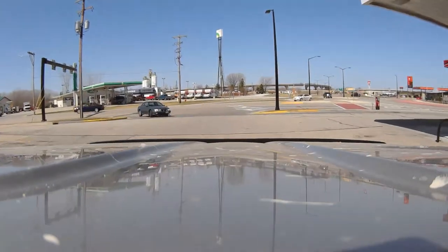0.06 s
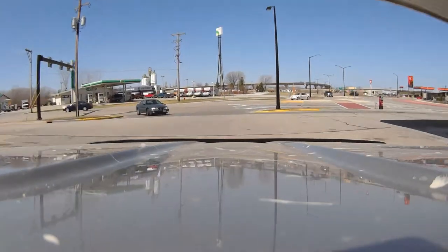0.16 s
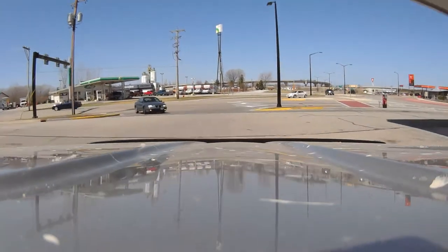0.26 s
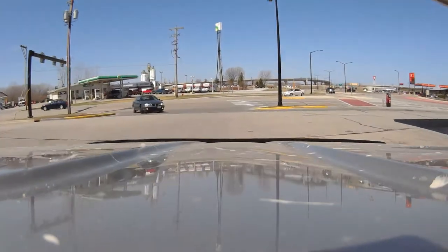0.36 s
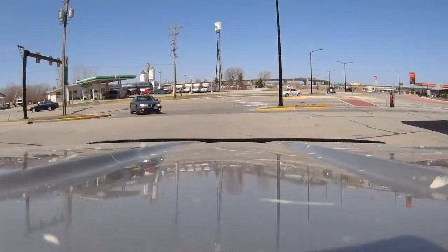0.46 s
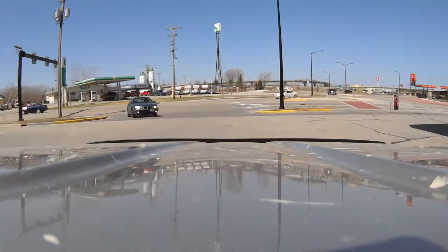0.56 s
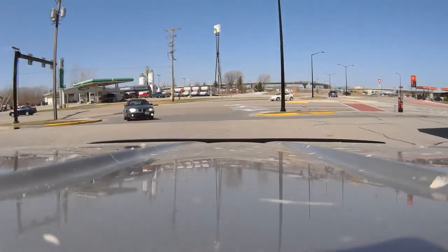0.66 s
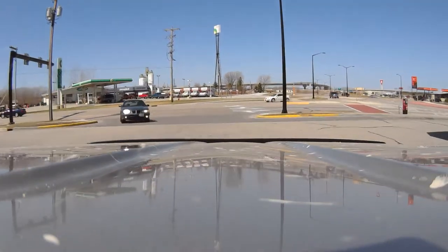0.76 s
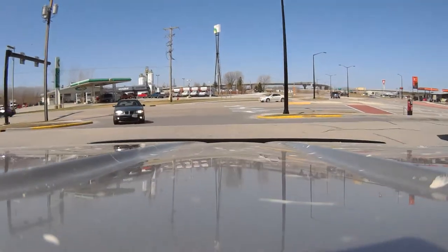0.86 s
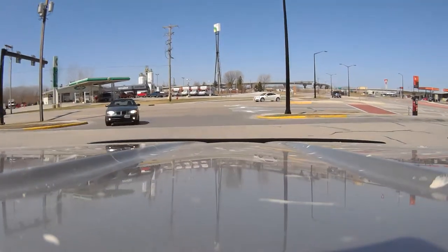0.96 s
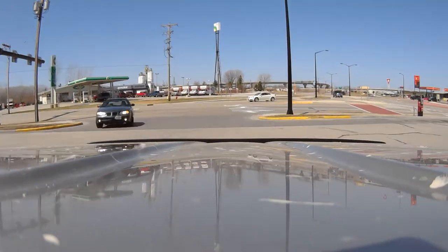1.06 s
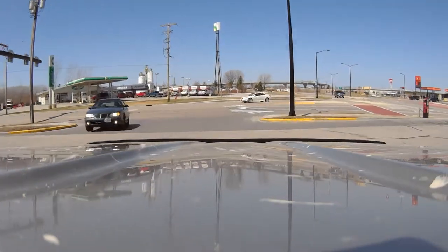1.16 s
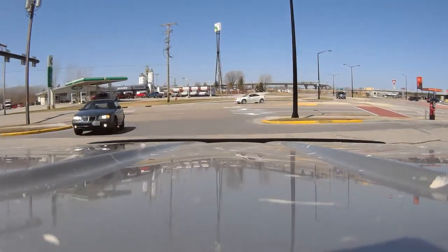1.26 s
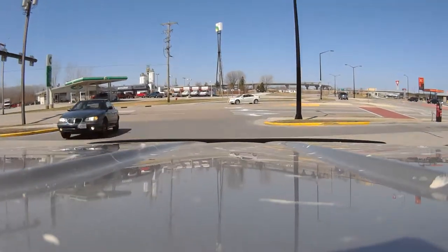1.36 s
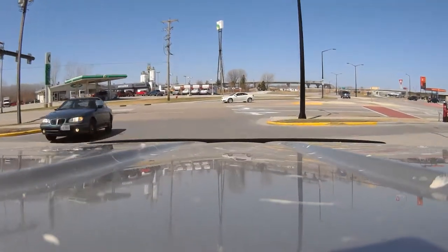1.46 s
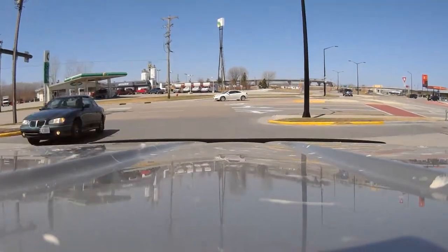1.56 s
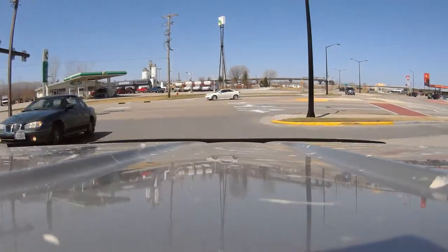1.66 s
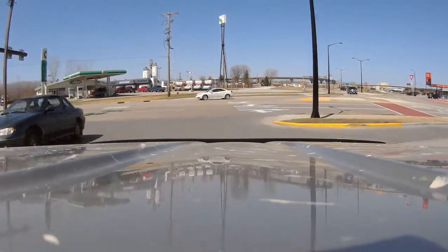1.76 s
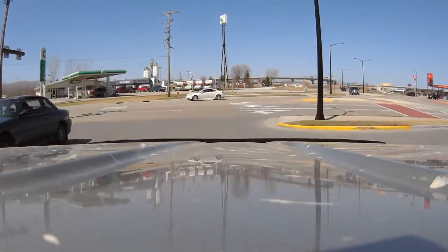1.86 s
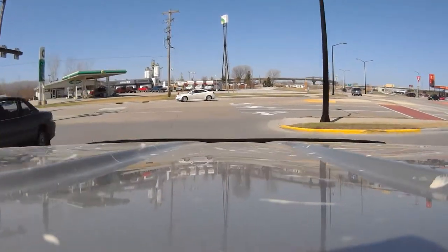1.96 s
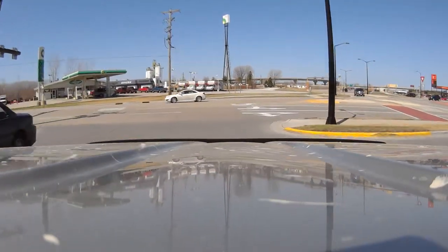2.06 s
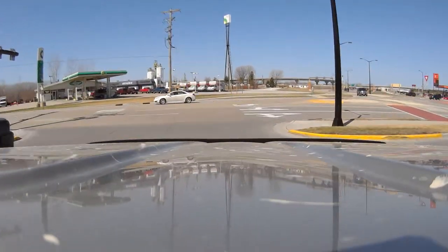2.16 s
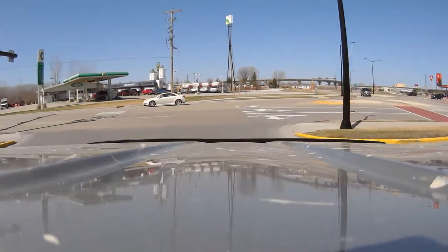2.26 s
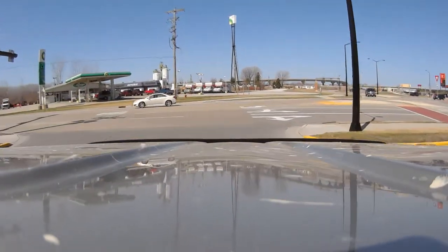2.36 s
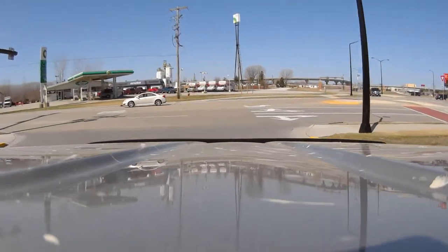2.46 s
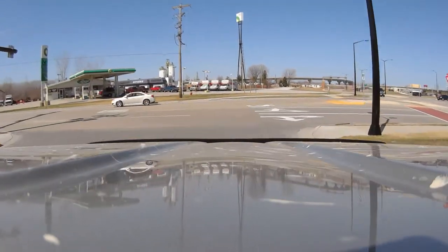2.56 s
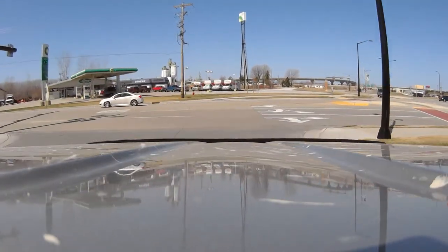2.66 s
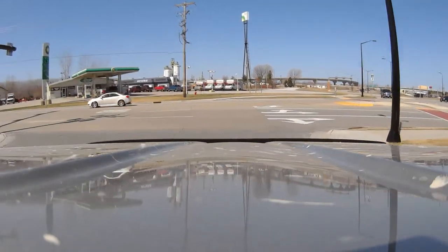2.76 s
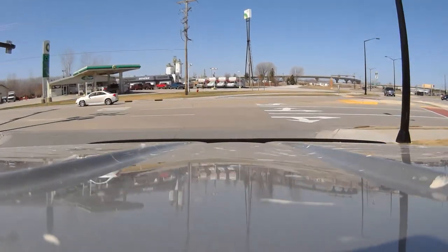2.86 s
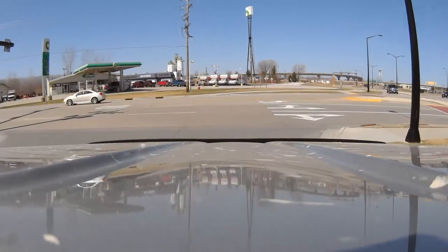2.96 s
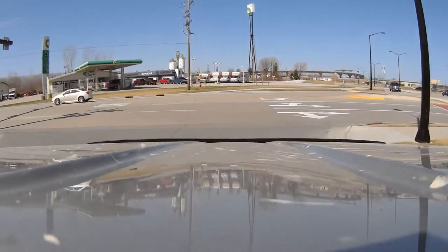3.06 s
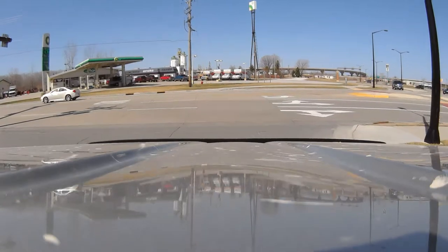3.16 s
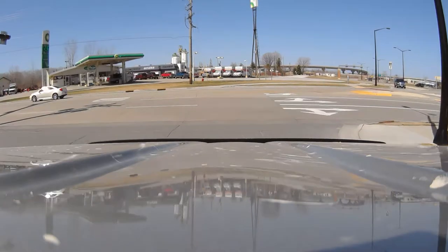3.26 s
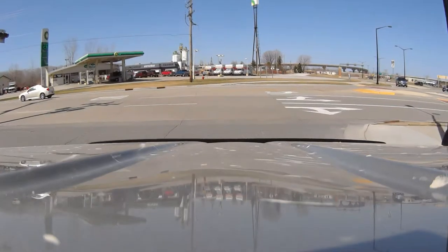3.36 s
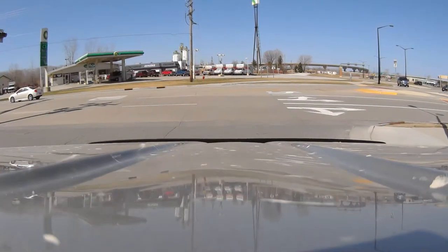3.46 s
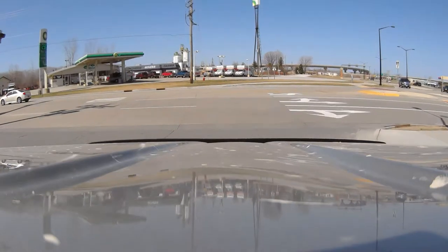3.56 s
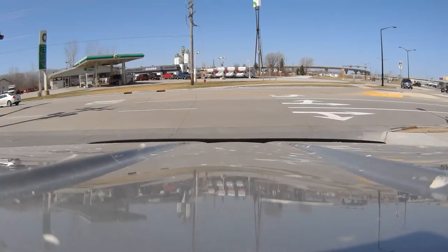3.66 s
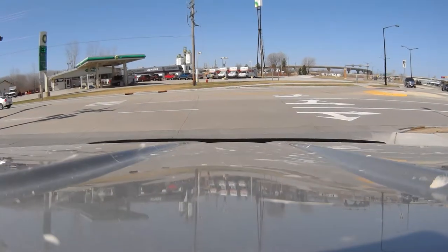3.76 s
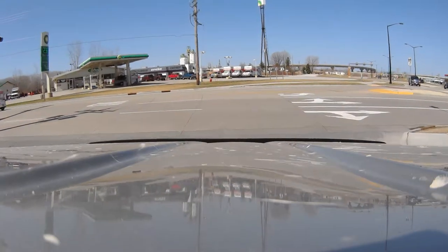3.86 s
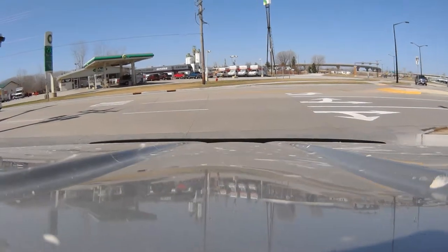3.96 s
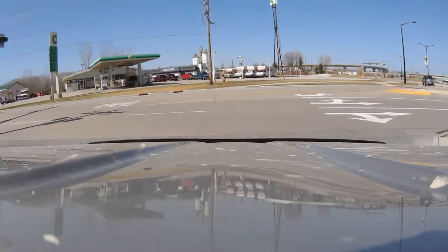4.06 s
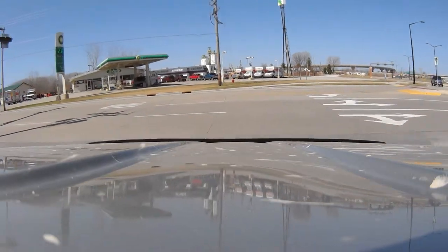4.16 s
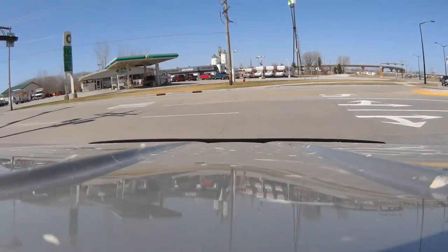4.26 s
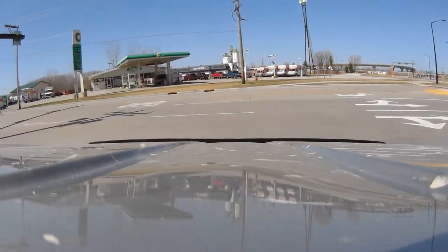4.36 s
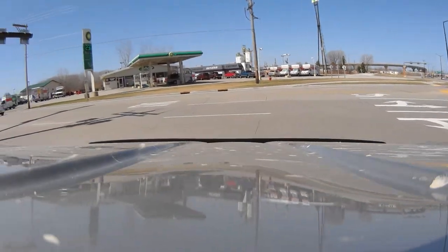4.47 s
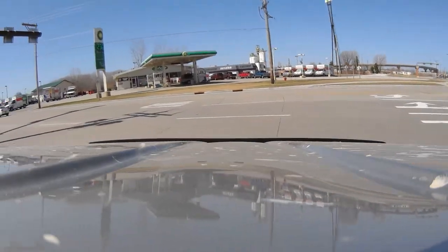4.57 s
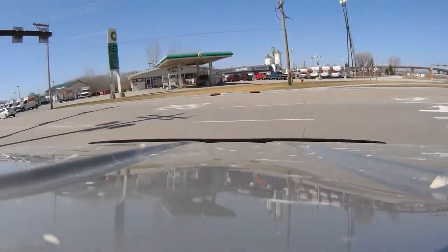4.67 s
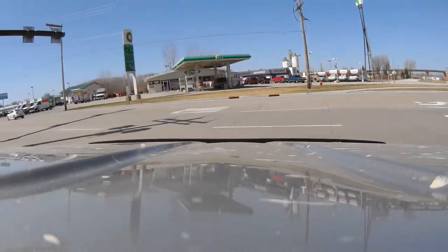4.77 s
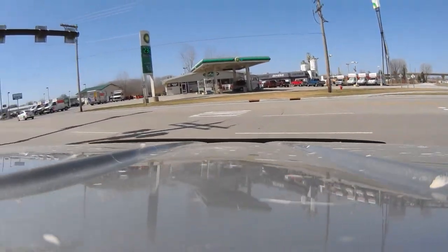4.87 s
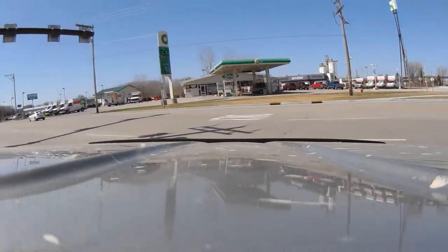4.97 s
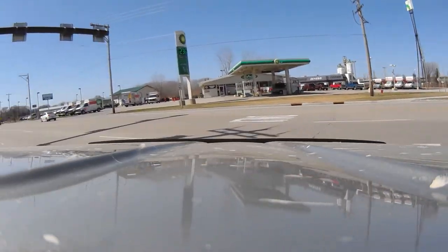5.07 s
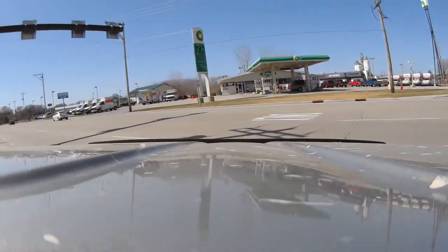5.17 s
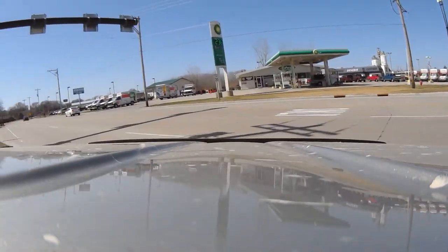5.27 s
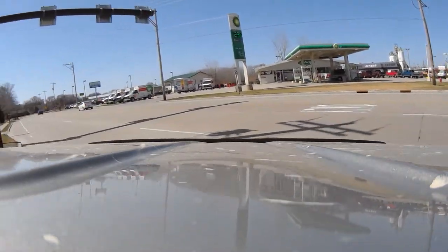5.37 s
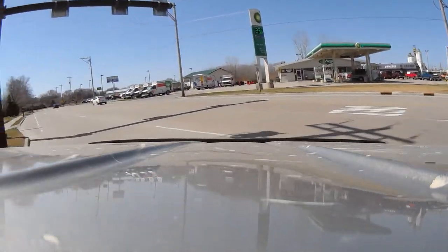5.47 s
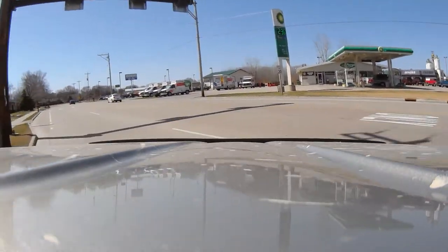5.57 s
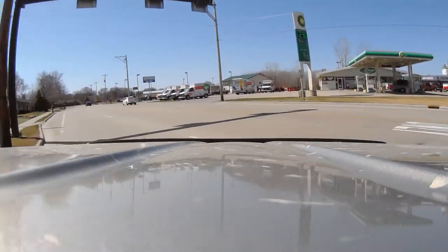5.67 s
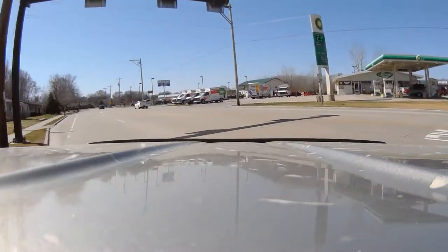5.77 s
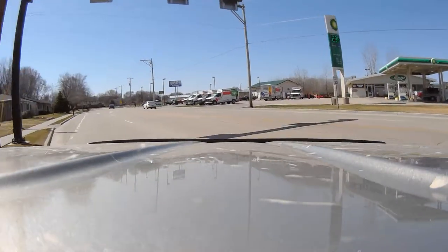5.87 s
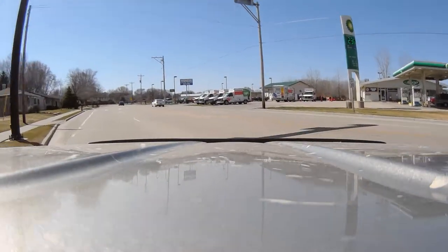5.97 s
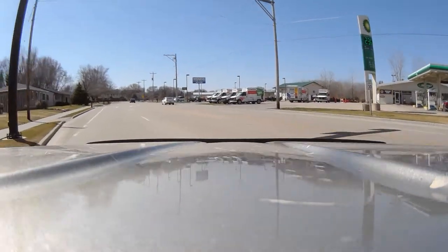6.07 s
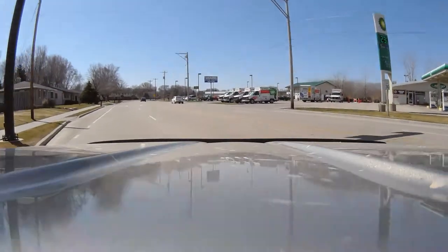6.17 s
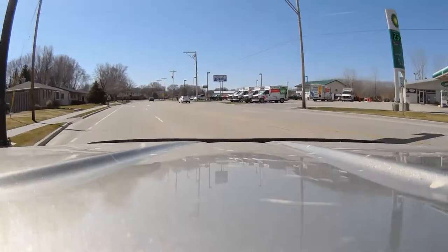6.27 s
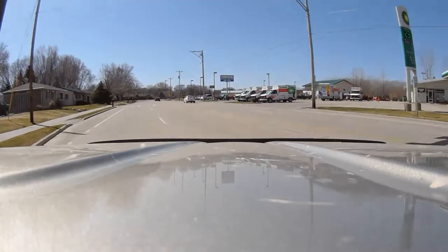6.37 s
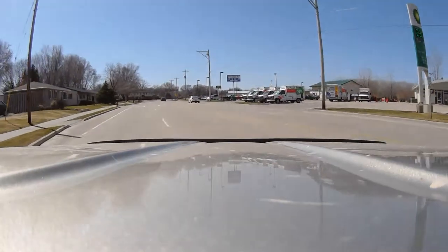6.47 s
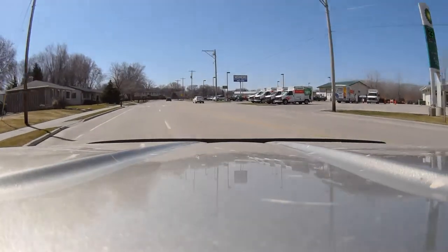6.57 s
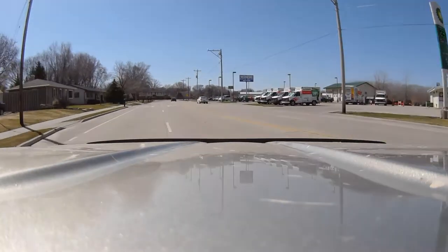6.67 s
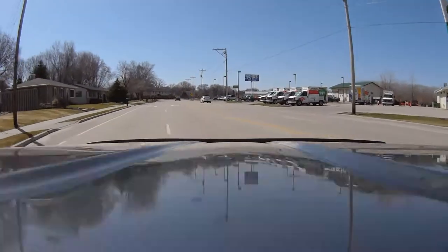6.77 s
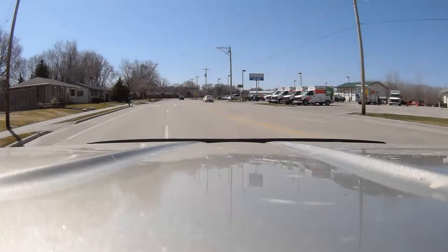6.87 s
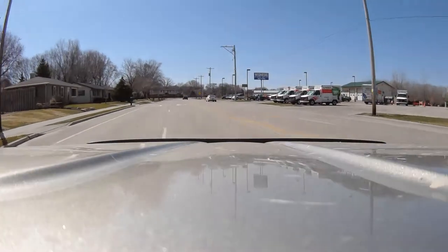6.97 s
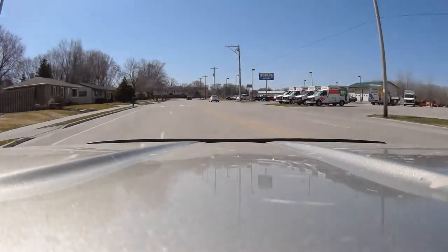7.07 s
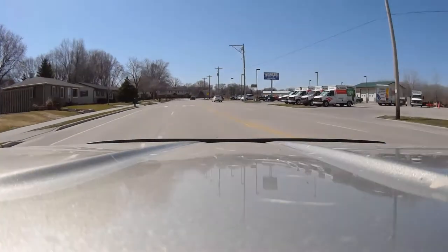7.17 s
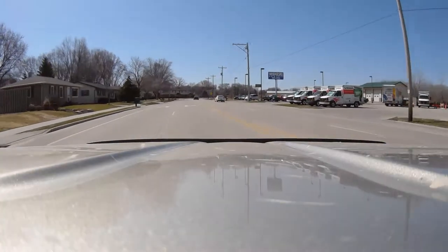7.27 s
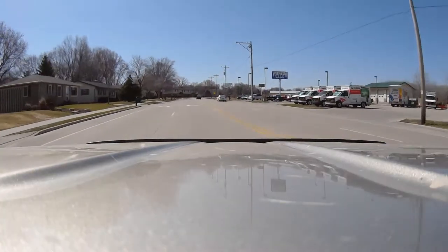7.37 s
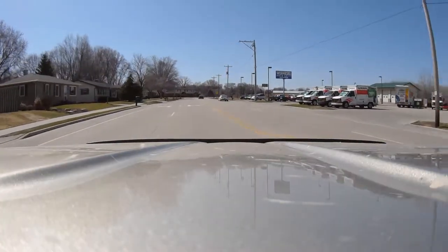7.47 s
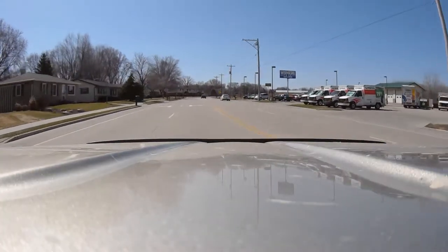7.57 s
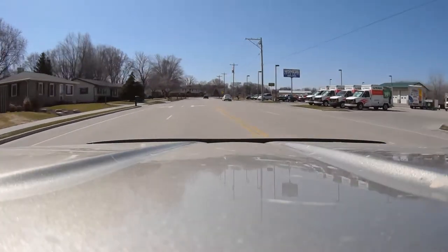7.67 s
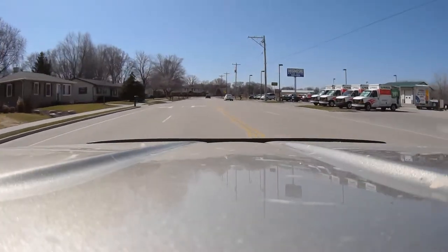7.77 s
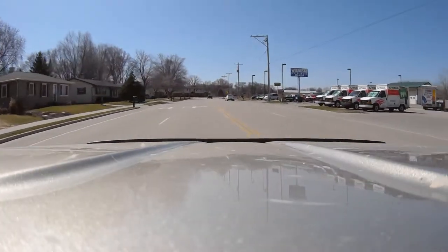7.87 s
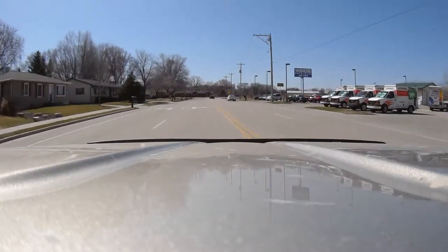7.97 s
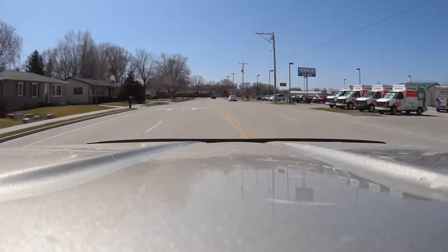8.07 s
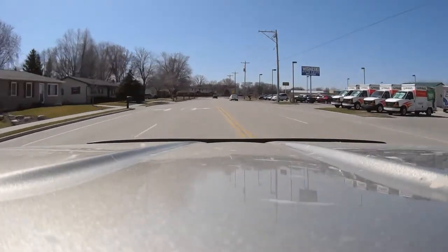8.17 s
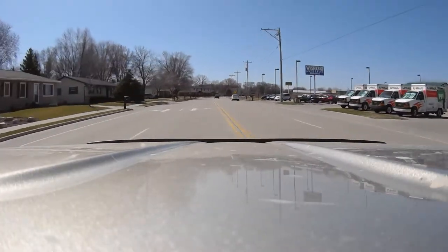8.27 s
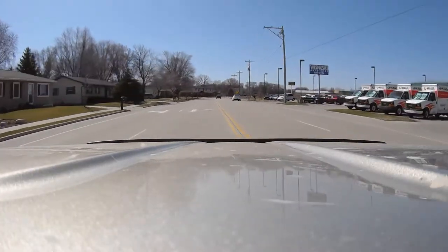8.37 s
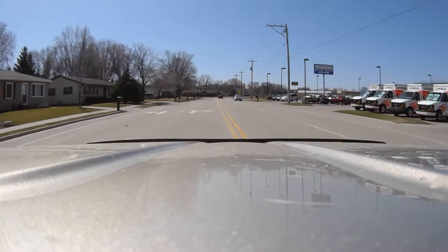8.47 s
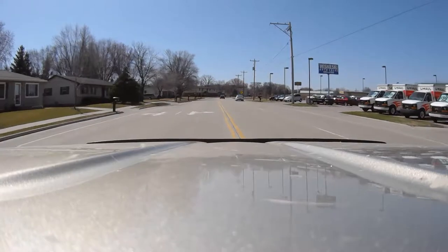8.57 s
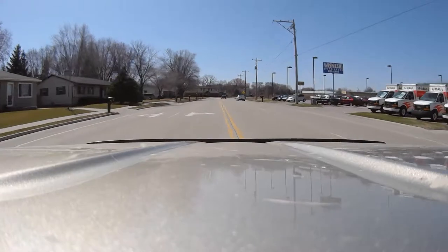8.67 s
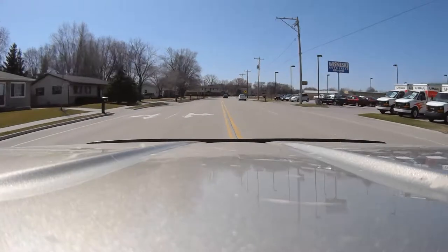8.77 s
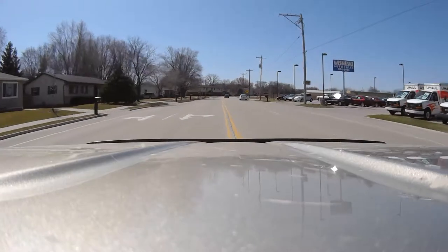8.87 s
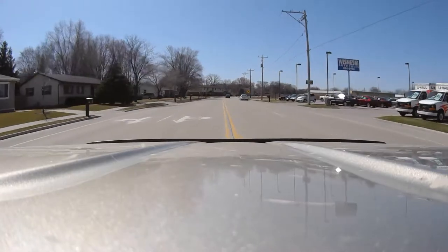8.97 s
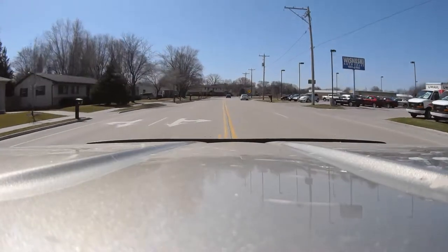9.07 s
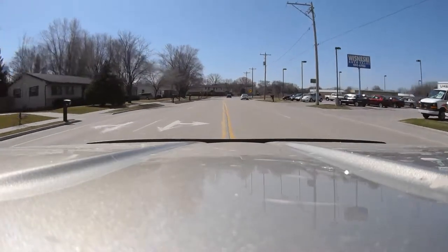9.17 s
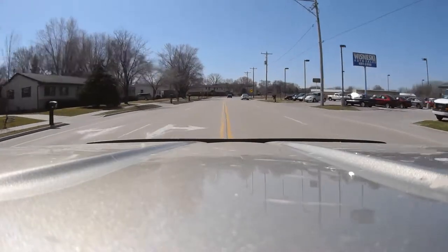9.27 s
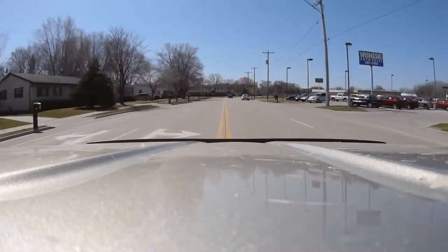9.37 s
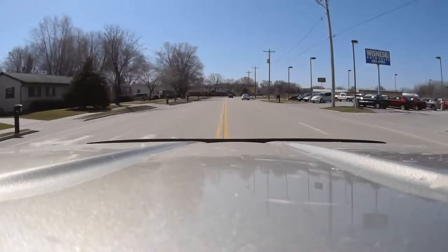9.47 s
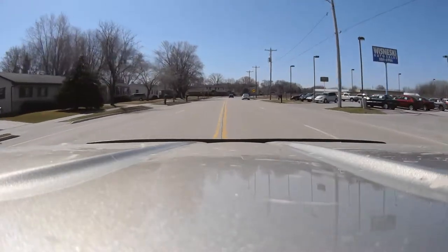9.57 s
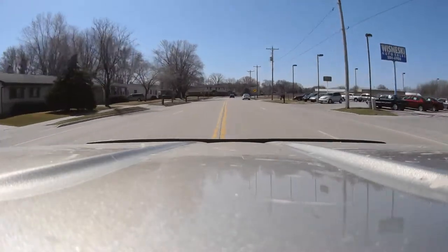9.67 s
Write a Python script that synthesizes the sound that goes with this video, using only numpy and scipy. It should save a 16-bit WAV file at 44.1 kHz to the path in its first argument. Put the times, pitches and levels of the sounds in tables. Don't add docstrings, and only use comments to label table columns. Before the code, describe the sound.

On a car's roof, the microphone hears low street rumble and a brief deep hum. Another car's slowing engine drones past, its note sinking with a faint gear whine and soft kerb knocks. Near four seconds the six-cylinder engine pulls away, its growl climbing continuously. Wind swells into heavy buffets, rough hiss and dense short crackles, finally overloading the input.

```python
import sys
import numpy as np
from scipy import signal
from scipy.fft import rfft, irfft, next_fast_len
from scipy.io import wavfile
from scipy.ndimage import uniform_filter1d, map_coordinates

SR = 44100
rng = np.random.default_rng(int(sys.argv[2]) if len(sys.argv) > 2 else 0)


def attenuation_scalar(level_db):
    decades = np.asarray(level_db, float) / 20
    return 10 ** decades


def inscribe(sig):
    pcm = np.round(np.clip(np.atleast_2d(sig).T, -1, 1) * 32767)
    wavfile.write(sys.argv[1], SR, pcm.astype(np.int16))


N = 428211

# pitch_hz, level_db [dB per Hz]
AIR_HISS = [(1500, -28), (3000, -4.5), (4100, -3.5), (5000, -4), (8000, -7)]
# level_db at middle wind, growth [dB per dB of turbulence]
TEAR_LAW = (-48.5, 1.01)


def unit(x):
    return x / np.sqrt(np.mean(x ** 2) + 1e-20)


def along(points, hz):
    f, v = np.transpose(points)
    return np.interp(np.log(hz + 1), np.log(f + 1), v)


def curves(rows):
    s, *cols = np.transpose(rows)
    t = np.arange(N) / SR
    return [np.interp(t, s, c) for c in cols]


def sounding(rows, fade):
    start, end = rows[0][0], rows[-1][0]
    return np.interp(np.arange(N) / SR, [start, start + fade, end, end + fade], [0, 1, 1, 0])


def wobble(rate):
    at = np.arange(0, N + 16, 16)
    knots = rng.standard_normal(int(N * rate / SR) + 4)
    return np.interp(np.arange(N), at, map_coordinates(knots, [at * rate / SR]))


def coloured(x, spectrum):
    m = next_fast_len(N + 8192)
    gain = attenuation_scalar(along(spectrum, np.fft.rfftfreq(m, 1 / SR)))
    return irfft(rfft(x, m) * gain, m)[..., :N]


def rush(spectrum, patchy_db):
    z = signal.stft(rng.standard_normal(N), nperseg=512)[2]
    field = uniform_filter1d(rng.standard_normal(z.shape), size=5, axis=0)
    field = uniform_filter1d(field, size=12, axis=1)
    noise = signal.istft(z * attenuation_scalar(patchy_db * unit(field)), nperseg=512)[1][:N]
    return unit(coloured(noise, spectrum))


def tone(hz, db, unsteady_db):
    level = np.sqrt(2) * attenuation_scalar(db + unsteady_db * wobble(13))
    phase = 2 * np.pi * np.cumsum(hz) / SR + 0.09 * wobble(18)
    return level * np.sin(phase)


def traffic():
    # time_s, level_db
    street_level = [(0, -40.5), (2, -41), (4, -40.5), (5, -34.5), (7, -37), (9.71, -26)]
    # pitch_hz, level_db [dB per Hz]
    street_colour = [(15, -32.5), (45, -13), (75, 2.5), (150, -3), (190, -12.5), (330, -8), (400, -17),
                     (540, -17.5), (640, -33), (800, -40.5), (960, -35), (1080, -33.5), (1500, -41.5),
                     (8000, -61.5)]
    # time_s, pitch_hz, level_db
    drone = [
        (1.4, 144.6, -43),
        (1.68, 124.1, -39),
        (1.95, 118.6, -35.5),
        (2.44, 114.5, -37.5),
        (2.68, 112.3, -34),
        (3.11, 97.2, -32),
        (3.49, 88.26, -27),
        (3.83, 96, -25),
        (3.95, 101, -37),
    ]
    # time_s, pitch_hz, level_db
    whine = [
        (2.93, 1880, -63),
        (3.0, 1800, -68),
        (3.1, 1724, -76),
        (3.22, 1618, -64),
        (3.36, 1569, -65),
        (3.55, 1545, -66),
        (3.66, 1540, -63),
        (3.72, 1575, -65),
    ]
    # start_s, length_s, first_hz, last_hz, level_db
    hums = [
        (0.022, 0.1, 91.2, 87.6, -19),
        (0.532, 0.25, 81, 80.6, -32.5),
        (1.01, 0.16, 76.1, 76.5, -31),
        (1.89, 0.46, 310.3, 312, -38),
        (2.612, 0.32, 342, 317.4, -38.5),
    ]
    t = np.arange(N) / SR
    street_db = curves(street_level)[0] + 8.0 + 0.16 * wobble(8.5)
    street = attenuation_scalar(street_db) * rush(street_colour, patchy_db=0.8)
    lines = 0
    for rows, throb_db in ((drone, 1.2), (whine, 3.8)):
        lines = lines + tone(*curves(rows), unsteady_db=throb_db) * sounding(rows, fade=0.042)
    for s, length, first_hz, last_hz, db in hums:
        share = np.clip((t - s) / length, 0, 1)
        swell = np.sin(np.pi * share ** .55)
        hz = first_hz + (last_hz - first_hz) * share
        lines = lines + swell * tone(hz * (1 + 0.008 * wobble(30.17)), db, unsteady_db=1.2)
    fan = attenuation_scalar(-62) * rush([(820, -40), (930, 0), (1000, 0), (1120, -40)], patchy_db=1)
    return street + lines + fan


def law(control_db, rule):
    return rule[0] + rule[1] * control_db


def airflow(t):
    # time_s, pressure_db, turbulence_db
    strength = [(0, -37, -57.5), (0.151, -47, -70), (1.2, -44, -70), (1.8, -36, -68.5), (2.6, -41, -67),
                (3.601, -43.5, -67.5), (4.199, -34.5, -60.5), (4.65, -33, -56.5), (5.0, -28, -52),
                (5.45, -27.5, -52.5), (5.92, -17, -52), (6.5, -19.5, -53.5), (7.1, -21.5, -53.5),
                (7.499, -19, -47), (8.1, -16.5, -47), (8.7, -17, -45), (9.1, -20.5, -48.5),
                (9.71, -13.5, -40.5)]
    # time_s, lift_db
    gusts = [(1.751, 3.5), (3.08, 4.5), (3.28, 5), (3.861, 5.5), (5.2, 3.5), (5.3, 0.5), (5.42, -3.5),
             (5.6, -2.5), (5.82, -4), (6.08, 4.5), (6.2, 4), (6.38, 3), (6.62, 2.5), (6.95, -3.5),
             (7.15, 1.5), (7.27, 3), (7.38, 6), (7.751, 3.5), (8.15, 3), (8.36, 5), (8.508, 10),
             (8.78, 3.5), (8.848, 9.5), (8.97, 4), (9.07, 2.5), (9.22, 2.5), (9.36, 4.5), (9.519, 5.5),
             (9.661, 3)]
    half_length_s, turbulent_share = 0.037, 0.66
    middle_pressure_db, middle_turbulence_db = -22, -52
    s, pressure_db, turbulence_db = np.transpose(strength)
    lift_db = sum(db * np.exp(-((t - at) / half_length_s) ** 2) for at, db in gusts)
    pressure = np.interp(t, s, pressure_db) - middle_pressure_db + lift_db
    turbulence = np.interp(t, s, turbulence_db) - middle_turbulence_db + turbulent_share * lift_db
    return pressure, turbulence


def wind():
    # pitch_hz, level_db [dB per Hz]
    buffet_colour = [(7.1, -35.5), (12, -6), (27, 8), (49, 3.5), (130, -3.5), (166, -9.5), (232, -13.5),
                     (260, -11), (340, -43.5), (570, -120)]
    flutter_colour = [(60, -120), (150, -11), (300, 1), (500, -2.5), (900, -14), (1500, -30), (3000, -59.5)]
    tear_colour = [(400, -36.5), (800, 2.5), (1200, -3), (2000, -13), (3200, -25.5), (5000, -44)]
    pressure_db, turbulence_db = airflow(np.arange(N) / SR)
    buffet_db = law(pressure_db, (-18, 1.008)) + 2.39 * wobble(5.4)
    flutter_db = law(turbulence_db, (-35, 0.7)) + 0.85 * wobble(8.7)
    tear_db = law(turbulence_db, TEAR_LAW) + 0.85 * wobble(8.7)
    hiss_db = law(turbulence_db, (-66, 1)) + 0.85 * wobble(8.7)
    burst = 1.6 * wobble(22) + 3.5 * wobble(90) + 4.2 * wobble(300)
    burst = burst * np.clip((tear_db + 69.0) / 16, .35, 1)
    buffet = attenuation_scalar(buffet_db) * unit(attenuation_scalar(2.72 * wobble(16)) * rush(buffet_colour, patchy_db=0.25))
    flutter = attenuation_scalar(flutter_db) * unit(attenuation_scalar(0.75 * burst) * rush(flutter_colour, patchy_db=1.4))
    tear = unit(coloured(attenuation_scalar(burst) * rng.standard_normal(N), tear_colour))
    hiss = unit(coloured(attenuation_scalar(0.95 * burst) * rng.standard_normal(N), AIR_HISS))
    return buffet + flutter + attenuation_scalar(tear_db + 2.5) * tear + attenuation_scalar(hiss_db + 2.5) * hiss


def ticks():
    # time_s, peak_db, rasp_db
    knocks = [
        (3.026, -37, -38),
        (3.048, -31.5, -36),
        (3.118, -34.5, -32),
        (3.178, -39, -18),
        (3.217, -32.5, -36),
        (3.231, -37, -23),
        (3.309, -35.5, -32),
        (3.379, -36.5, -33),
        (3.404, -40, -30),
    ]
    building = [(4.973, -25.5, -18), (5.085, -26, -14.5), (5.356, -25, -16), (5.416, -25, -17),
                (5.503, -27.5, -20.5), (5.519, -27, -20), (5.642, -27, -15.5), (5.658, -23, -18.5),
                (5.689, -22, -19.5), (5.75, -28.5, -14.5), (5.763, -23.5, -17), (5.847, -27, -16.5),
                (5.926, -19, -17), (6.007, -29.5, -23.5), (6.021, -25, -18.5), (6.052, -30, -21),
                (6.075, -22.5, -16.5), (6.102, -24.5, -17.5), (6.156, -22, -16), (6.191, -20, -17.5),
                (6.234, -27.5, -18), (6.304, -23.5, -24), (6.32, -21.5, -14), (6.353, -23.5, -15.5),
                (6.369, -21.5, -18), (6.509, -30, -15.5), (6.633, -26, -16.5), (6.792, -28, -18.5),
                (6.882, -25, -14), (6.973, -21.5, -17.5), (7.024, -25, -17.5), (7.143, -28.5, -22),
                (7.236, -23.5, -19)]
    at_speed = [(7.452, -24.5, -15), (7.532, -25, -24), (7.609, -19.5, -15.5), (7.718, -24.5, -19),
                (7.742, -24, -20.5), (7.763, -18.5, -19), (7.803, -23, -15.5), (8.015, -24.5, -18),
                (8.061, -20.5, -15.5), (8.074, -13.5, -15), (8.29, -14, -15.5), (8.44, -16, -16.5),
                (8.485, -15, -11), (8.535, -17, -17), (8.573, -17.5, -14.5), (8.602, -17.5, -14),
                (8.684, -24.5, -16.5), (8.809, -13.5, -16.5), (8.864, -15, -13.5), (8.955, -20, -18),
                (9.012, -25.5, -16.5), (9.138, -21.5, -10.5), (9.184, -23, -14), (9.215, -20.5, -15.5),
                (9.251, -25, -17), (9.324, -18.5, -14), (9.371, -19.5, -16), (9.413, -23, -12),
                (9.449, -17.5, -15), (9.484, -17, -14), (9.562, -23, -15), (9.68, -19, -18)]
    flurries = [(4.594, -35, -15), (4.728, -39.5, -16), (4.849, -38, -13), (5.006, -27, -15.5),
                (5.029, -32.5, -14), (5.046, -30.5, -15), (5.057, -36, -13), (5.111, -27, -15),
                (5.127, -30, -15.5), (5.154, -35.5, -16), (5.187, -26, -16.5), (5.204, -27.5, -16.5),
                (5.216, -23.5, -15.5), (5.242, -30, -15.5), (5.268, -27.5, -17), (5.305, -30.5, -13),
                (5.335, -27, -16.5), (5.367, -26, -14.5), (5.381, -26, -17), (5.437, -28, -16),
                (7.344, -30.5, -16), (7.39, -18.5, -15.5), (7.423, -16.5, -15.5), (7.582, -25, -15.5),
                (7.621, -21, -14.5), (7.677, -21.5, -13.5), (7.818, -23, -17), (8.511, -18.5, -14),
                (8.837, -19.5, -15), (9.225, -22.5, -14.5)]
    rows = np.vstack([knocks, building, at_speed, flurries])
    edge_under_rasp_db = -16.5
    return np.c_[rows, rows[:, 2] + edge_under_rasp_db]


def small_crackles():
    count, from_s = 50, 5.5
    draw = rng.standard_normal((count, 4))
    s = np.linspace(from_s, N / SR - .05, count) + .02 * np.clip(draw[:, 0], -2, 2)
    db = law(airflow(s)[1], TEAR_LAW) + 16.5 + 2 * draw[:, 1]
    rasp_db = -17 + 4.0 * draw[:, 2]
    edge_db = -29.5 + 3.5 * draw[:, 3]
    return np.c_[s, db, rasp_db, edge_db]


def crackles():
    # time_s, peak_db, rasp_db, edge_db
    more_crackles = [(1.606, -31.5, -32, -38), (1.903, -29, -25, -49), (3.057, -31, -34, -47),
                     (3.089, -29.5, -18, -39), (3.107, -29.5, -33, -43), (3.194, -24.5, -34, -33),
                     (3.241, -27.5, -31, -39), (3.271, -34.5, -35, -31), (3.287, -25.5, -39, -43),
                     (3.36, -31.5, -25, -36), (4.444, -25, -25.5, -31.5), (4.482, -31, -22.5, -29),
                     (4.55, -32, -24.5, -27), (5.179, -25.5, -11, -40), (5.229, -23.5, -10.5, -33),
                     (5.711, -21.5, -13, -32), (7.933, -24.5, -13, -29), (7.985, -17.5, -13.5, -31),
                     (8.151, -21, -13.5, -34.5), (8.326, -17, -10, -20.5), (8.372, -19, -14, -32),
                     (8.709, -20, -18.5, -36.5), (8.782, -20, -9, -30), (8.989, -16.5, -27, -32),
                     (9.027, -27, -2.5, -19.5), (9.064, -17.5, -18, -32), (9.346, -18.5, -24, -19),
                     (9.531, -13.5, -11, -29), (9.549, -30, -17, -27), (9.646, -24.5, -11, -36)]
    # time_s, peak_db, rasp_db, edge_db
    later_crackles = [(5.792, -20, -14.5, -32.5), (5.878, -19.5, -20, -38.5), (5.944, -21, -12, -26),
                      (6.181, -17.5, -17.5, -27), (6.225, -25, -19, -29), (6.278, -21, -20, -29.5),
                      (6.398, -18.5, -30, -38.5), (6.578, -22.5, -29, -25), (6.663, -16.5, -18, -38),
                      (6.712, -19, -28, -42), (6.754, -16, -14, -40.5), (6.845, -17.5, -13, -26),
                      (7.093, -18, -15.5, -31.5), (7.386, -16.5, -5, -27.5), (7.411, -16.5, -12.5, -28.5),
                      (7.488, -14.5, -15, -27), (7.666, -20, -15, -39), (7.774, -18, -23, -38),
                      (7.909, -13, -18.5, -27), (7.964, -19.5, -7.5, -23), (8.041, -15, -18.5, -34.5),
                      (8.274, -17.5, -13, -28.5), (8.626, -17, -9.5, -31.5), (8.824, -16.5, -3, -22.5),
                      (8.858, -13, -21, -31), (8.975, -12, -19, -31.5), (9.077, -12.5, -14.5, -31.5),
                      (9.385, -18, -7.5, -24), (9.516, -24.5, -4.5, -25), (9.625, -12.5, -13, -29)]
    # pitch_hz, level_db [dB per Hz]
    colours = [
        [(150, -27), (350, 5.5), (600, 3), (1000, -3), (1700, -19), (3000, -61.5)],
        [(600, -36), (1200, 0.5), (2400, -5.5), (3600, -15.5), (6000, -35.5)],
        [(2000, -32.5), (4000, 7), (8000, 2.5)],
    ]
    events = np.vstack([more_crackles, later_crackles, ticks(), small_crackles()])
    parts = np.zeros((3, N + SR))
    t = np.arange(round(.01 * SR)) / SR
    chance = rng.random((len(events), 2, 3))
    decay_s = np.array([[.012], [.0065], [.002]])
    jumps = rng.standard_normal((len(events), 3, 1, len(t))) * attenuation_scalar(-60 * abs(t - .004) / decay_s)
    heard = np.array([attenuation_scalar(along(colour, np.fft.rfftfreq(len(t), 1 / SR))) for colour in colours])
    power = np.mean(np.abs(rfft(jumps) * heard) ** 2, axis=-1, keepdims=True) / len(t)
    jumps = jumps / np.sqrt(power)
    for (s, db, rasp_db, edge_db), (late, weak), group in zip(events, chance, jumps):
        level = attenuation_scalar(db + np.array([[-9.5], [rasp_db - 8], [edge_db - 5.5]]))
        delays = [0, *(.022 * late - .005)]
        losses_db = [0, *(-8 - 12 * weak + min(0, (db + 28.0) * 0.54))]
        for delay, loss_db, jump in zip(delays, losses_db, group):
            start = round((s - 0.0018 + delay) * SR)
            parts[:, start:start + len(t)] += attenuation_scalar(loss_db) * level * jump
    return sum(coloured(part[:N], colour) for part, colour in zip(parts, colours))


def engine():
    # time_s, turns_hz
    crankshaft = [(3.78, 15.7), (3.99, 24.7), (4.09, 27.3), (4.24, 28.5), (4.42, 29.4), (4.6, 32.2),
                  (4.79, 32.5), (4.95, 33.7), (5.5, 36.3), (6, 39.3), (6.7, 44.3), (7.6, 52), (8.6, 60.6),
                  (9.71, 71)]
    shaft_orders = {3: (-16.5, 33.5, 16), 4: (-29, 77.5, 11), 5: (-29.5, 73.5, 10.5), 6: (-26.5, 53.5, 10),
                    7: (-31.5, 44, 199.5), 9: (-29, 43, 230)}
    # pitch_hz, width_hz, level_db
    exhaust = [(63.4, 17, 1.5), (88, 41.7, 4), (132, 34, -3.5), (171, 57, 1), (216.8, 24, 2),
               (298.3, 29.4, 2), (344.8, 32, 4), (390.6, 33, -4), (410, 53, -3.5)]
    # time_s, level_db
    brake = [
        (3.74, -79),
        (3.8, -76),
        (3.9, -81),
        (4.2, -77),
        (4.32, -80),
    ]
    shaft_hz, = curves(crankshaft)
    grid = np.arange(700)
    pipe = np.sqrt(sum((attenuation_scalar(db) / (1 + (2 * (grid - c) / w) ** 2)) ** 2 for c, w, db in exhaust))
    orders = 0
    for k, (db, best_hz, loss_db) in shaft_orders.items():
        order_db = db - loss_db * np.log2(shaft_hz / best_hz) ** 2
        rough_db = .6 if k == 3 else 1.6
        resonance = np.interp(k * shaft_hz, grid, pipe)
        orders = orders + resonance * tone(k * shaft_hz, order_db, rough_db)
    release = attenuation_scalar(curves(brake)[0]) * rush([(3600, -50), (3950, -1), (4150, 4), (4500, -53)], patchy_db=0.5)
    intake = attenuation_scalar(-63.5) * rush(AIR_HISS, patchy_db=3.0) * sounding(crankshaft, fade=0.28)
    return orders * sounding(crankshaft, fade=0.035) + release * sounding(brake, fade=.04) + intake


def whistle():
    # time_s, pitch_hz, level_db
    chirp = [
        (9.55, 2500, -49),
        (9.6, 2500, -48),
        (9.615, 2500, -50),
    ]
    return tone(*curves(chirp), unsteady_db=1.0) * sounding(chirp, fade=.01)


def scene():
    return (traffic() + wind() + crackles() + engine() + whistle())[None]


def low_pass(x):
    return signal.sosfilt(signal.butter(12, 8640, fs=SR, output="sos"), x)


def record(dry):
    top, hard = .51, 40
    hot = coloured(dry, [(12, -7.0), (32, -0.5)])
    clipped = hot / (1 + np.abs(hot / top) ** hard) ** (1 / hard)
    limited = coloured(clipped, [(7600, 0), (8300, -7), (8700, -24), (9100, -90)]) - .0099
    return low_pass(limited)


dry = scene()
out = record(dry)
inscribe(out)
```